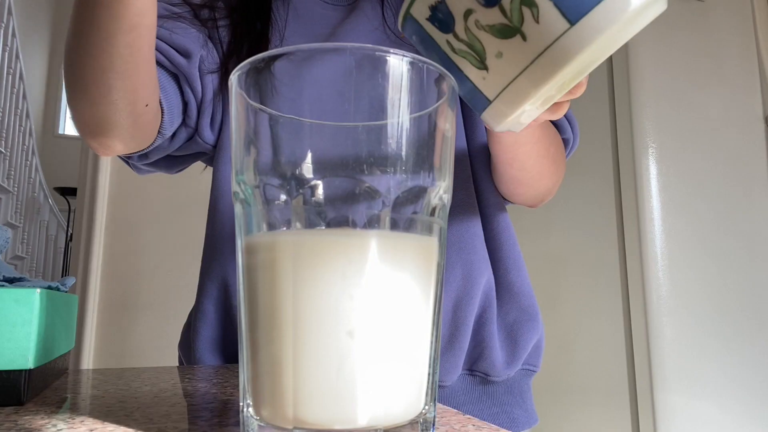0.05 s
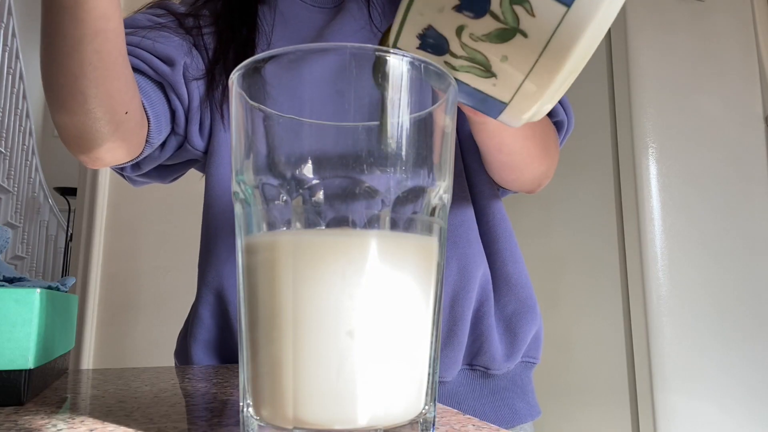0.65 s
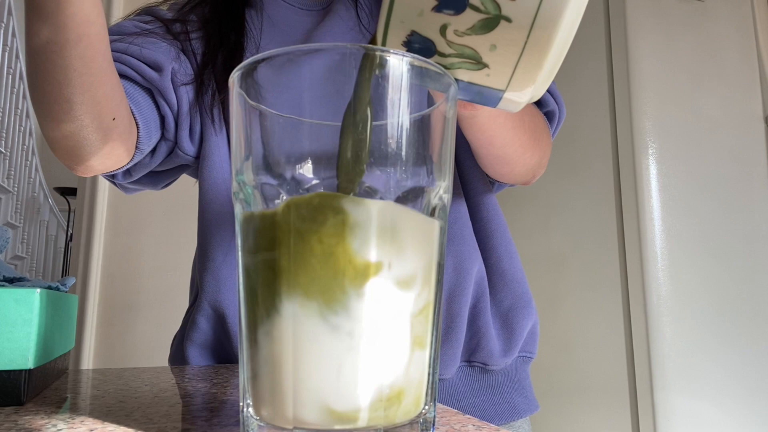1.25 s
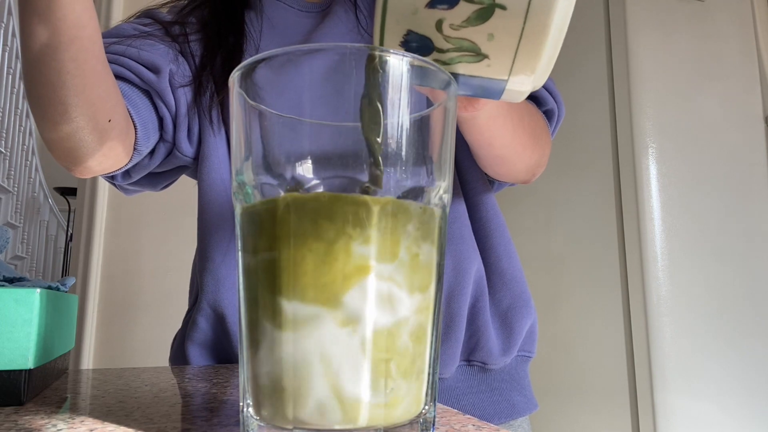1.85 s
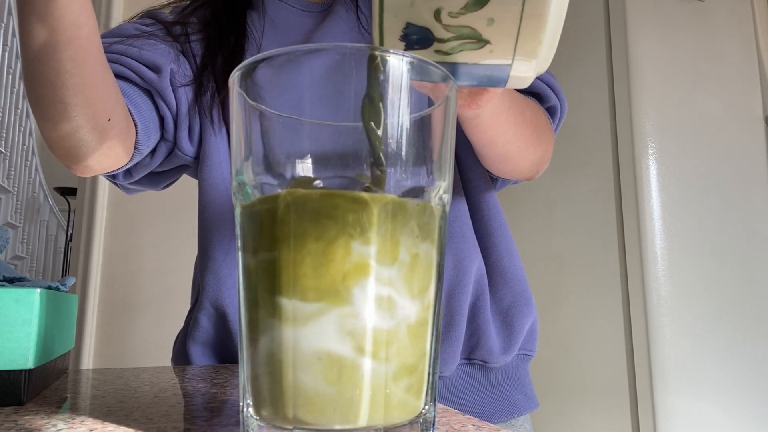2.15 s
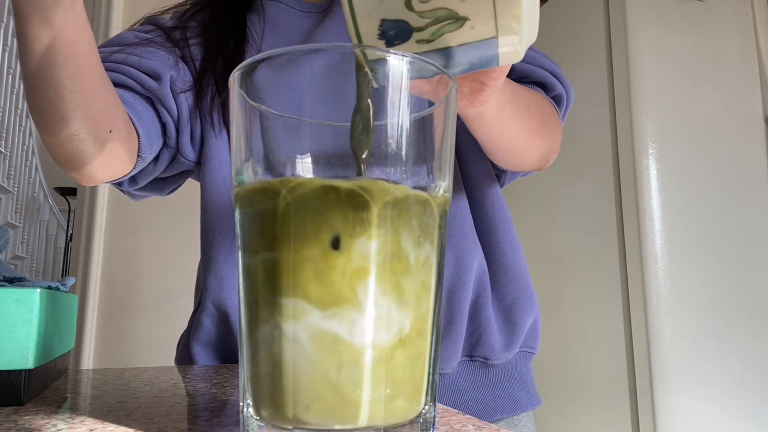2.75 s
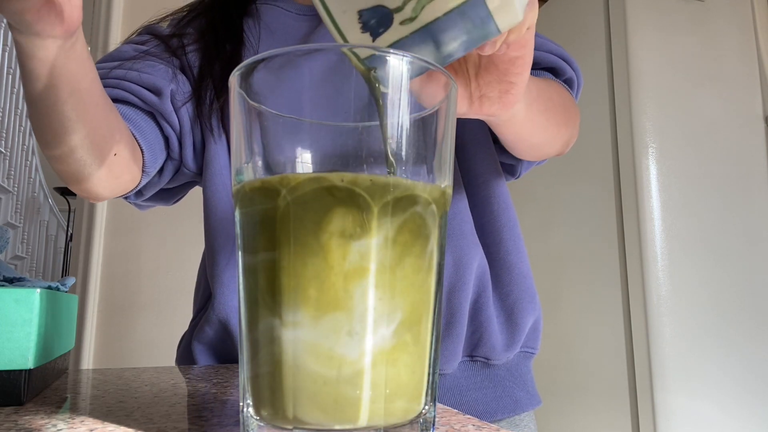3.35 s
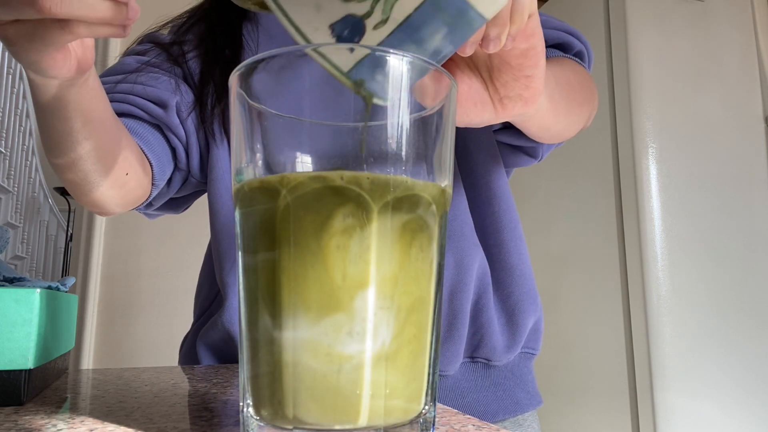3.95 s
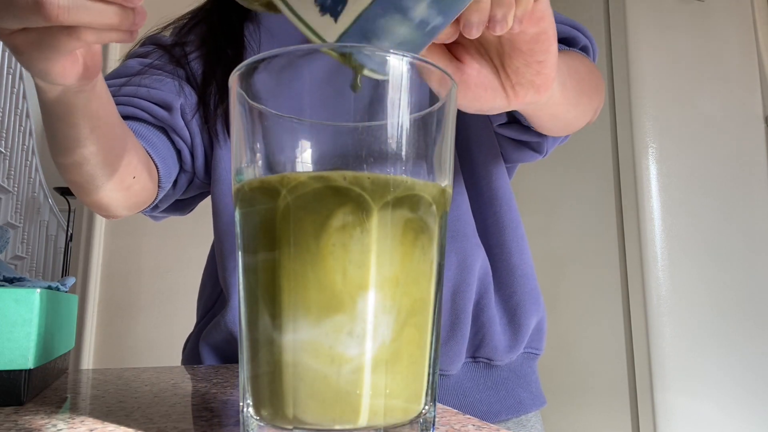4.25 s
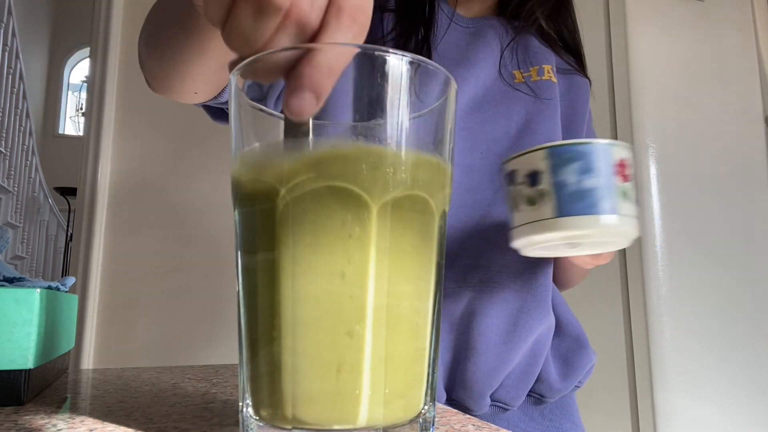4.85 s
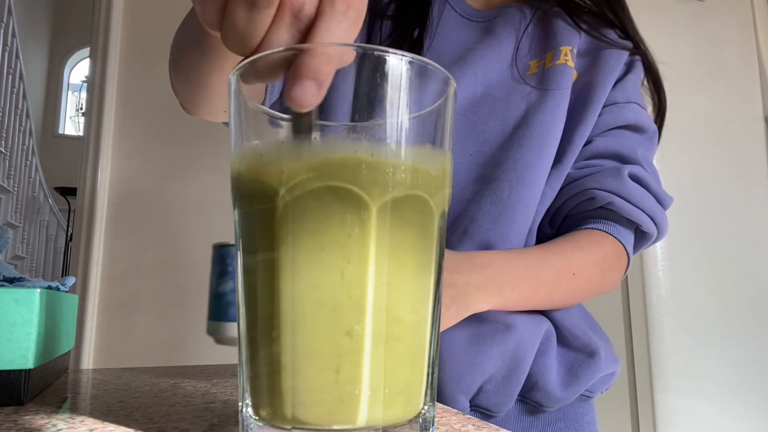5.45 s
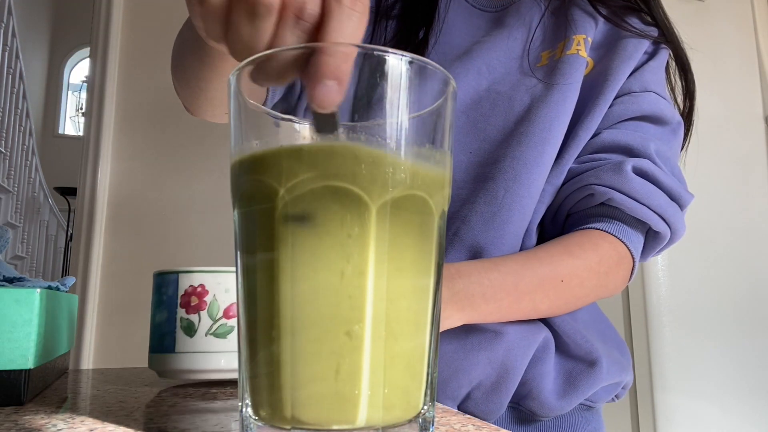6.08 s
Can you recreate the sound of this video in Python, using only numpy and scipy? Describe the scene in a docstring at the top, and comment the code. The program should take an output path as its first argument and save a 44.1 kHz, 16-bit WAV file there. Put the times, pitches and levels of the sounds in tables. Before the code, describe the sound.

A ceramic cup knocks on the rim of a glass of milk, and a thin stream of liquid pours in with quiet gurgles, small drips and a few light ticks. Then a steel spoon stirs quickly, clinking brightly on the glass wall and knocking on its base as the milk swirls. The stereo microphone is close by in a small kitchen with a faint appliance hum.

```python
"""A tall glass of milk rings in its wall modes as a ceramic cup knocks on its rim and rests there to pour.
The thin stream is heard as quiet gurgles, bubbles and spray; the added milk loads the wall and lowers
the ring. A steel spoon then stirs quickly, clinking on the wall and knocking on the base.
The stereo microphone stands close by on the counter of a small kitchen, where an appliance hums."""
import sys
import numpy as np
from scipy import signal
from scipy.fft import rfft, irfft, next_fast_len
from scipy.io import wavfile
from scipy.ndimage import map_coordinates

SR = 44100
rng = np.random.default_rng(int(sys.argv[2]) if len(sys.argv) > 2 else 0)


def store_pcm(level_fs):
    """Save levels as 16-bit WAV."""
    pcm = np.round(np.clip(level_fs, -1, 1) * 32767).astype(np.int16)
    wavfile.write(sys.argv[1], SR, np.atleast_2d(pcm).T)


N = 269792
SPOON_IN_S = 4.6  # the spoon enters the glass

# the motor's low and high tones: (frequency [Hz], level [dB])
HUM_TONES = [(96.9, -59), (145.3, -62.5), (199.2, -60), (220.7, -65.5), (360.7, -59.5), (387.6, -56),
             (683.7, -73.5)]
WHINE_TONES = [(3250, -92.5), (3750, -100)]
# spectra of rushing air, poured milk, stirred milk and a contact: (frequency [Hz], relative level [dB])
AIR_SPECTRUM = [(15, -27), (25, -9), (91, -3), (122, -11.5), (204, -9), (253, -13.5), (297, -8), (322, -14),
                (389, -9.5), (421, -16.5), (684, -15.5), (997, -30), (1240, -22.5), (2230, -44),
                (15500, -65)]
SLOSH_SPECTRUM = [(120, -29), (250, 6), (340, 0.5), (460, 10), (580, -15), (850, -9), (1500, -37),
                  (4000, -63)]
SWIRL_SPECTRUM = [(180, -44.5), (330, 7), (460, 8), (620, -21), (900, -15), (1400, -8), (2800, -14.5),
                  (5000, -24), (6200, -42), (10000, -63), (12500, -58.5), (15000, -69)]
CRACK_SPECTRUM = [(200, -16.5), (450, -7), (750, -6), (1150, 3.5), (1700, -15), (2400, -4), (3200, -18),
                  (5000, -10), (5900, -22.5), (8200, -1), (10200, -22), (12600, -0.5), (14200, -26.5),
                  (15800, -30)]
# likeness of the air noise at the two microphones: (frequency [Hz], correlation [-1 to 1])
AIR_CORRELATION = [(60, 0.91), (180, 0.55), (550, -0.4), (1650, -0.42), (4970, -0.31), (15000, 0.75)]
# milk moving under the stream and around the spoon: (time [s], level [dB])
SLOSH_LEVEL = [(0.38, -64), (0.45, -43.5), (0.56, -40.5), (0.63, -56), (0.75, -57), (0.82, -47.5),
               (0.92, -62), (1.4, -72), (3.5, -66.5), (4.6, -68.5)]
SWIRL_LEVEL = [(4.60, -111), (4.64, -46.5), (4.8, -41.5), (5.0, -51), (5.12, -40), (5.35, -47.5),
               (5.65, -48), (6.1, -50.5)]
# progress of the pour: (time [s], share still to come [0 to 1])
POUR_TO_COME = [(0.4, 1), (1.35, .75), (1.8, .6), (2.6, .34), (3.5, .22), (4.6, 0)]

# modes of the full glass: (frequency [Hz], relative level [dB], nominal t60 [s],
# pitch excess before the pour [fraction], left minus right [dB], left phase lead [rad])
GLASS_MODES = [(460.3, -15.5, 0.064, 0.0089, -6.5, 0.45), (637, -21.5, 0.052, 0.015, 17, -1.5),
               (762, -13.5, 0.083, 0.012, 4, -1.5), (897, -4.5, 0.034, 0.016, -6, -0.84),
               (1056, -10, 0.023, 0.037, -13.5, -1.3), (1273, -2.5, 0.016, 0, -12, -1.4),
               (1378, -5.5, 0.018, 0.028, -12.5, -2.5), (2028, -11.5, 0.27, 0.0773, 5, -2.3),
               (2048, -3, 0.19, 0.064, -6.5, -0.92), (2190, -24.5, 0.055, 0.053, 6.5, -4),
               (4494, -9.5, 0.17, .018, 0.5, 1), (7430, -19.5, 0.2, 0.033, -4, -0.4),
               (7484, -0.5, 0.066, 0.011, -2, -1.5), (12000, -10, 0.029, 0, -1, 0),
               (12580, -0.5, 0.02, 0.016, 1.5, -0.2)]
# modes of the cup with the counter, and of the spoon: (frequency [Hz], relative level [dB], t60 [s])
CUP_MODES = [(81.6, -16, 0.097), (215, -15, 0.035), (286, -13.5, 0.058), (364.5, 2, 0.035),
             (749, -13.5, 0.094), (866, 3, 0.026), (2448, -19.5, 0.12), (5717, -51, 0.16)]
SPOON_MODES = [(3906, -26, 0.12), (4020, -29, 0.18), (5204, -21.5, 0.11), (5267, -11, 0.062),
               (7700, -29, .08), (7700, -33, 0.047), (13300, -36, 0.049)]
# the glass's five registers, its low knock, fundamental and three overtones: (frequency [Hz])
REGISTER_HZ = [1100, 2050, 4500, 7500, 12500]
# how each kind of contact excites those registers: (relative drive [dB])
BUMP_DRIVE = [-3.5, -0.5, -12, -11.5, -39.5]  # a bump or tick during the pour
BUBBLE_DRIVE = [3, 1, -23, -26, -37]  # a bubble, through the liquid
KNOCK_DRIVE = [0.5, -8.5, -27, -21, -33.5]  # spoon tip on the thick base: mostly knock
CLINK_DRIVE = [-13, 0, -10.5, -21.5, -38.5]  # handle near the rim: a pure ring
STRIKE_DRIVE = [-5.5, 0.5, -26.5, -4.5, -7]  # bowl on the wall: hard and bright
SKID_DRIVE = [-34, -37.5, -16.5, -9.5, -33]  # the bowl skids just after a strike
REBOUND_DRIVE = [-20, -10.5, -30, -20.5, -24]  # then falls back on the wall

# bumps and light ticks on the glass during the pour:
# (time [s], thud [dB], hollow note [dB], ring [dB], brightness [dB], t60 scale [ratio])
POUR_BUMPS = [(0.3815, -13, -29, -31.5, 7, 1.53), (0.431, -20.5, -35, -65, 1, 0.65),
              (0.452, -37, -27, -69, 0, 0.53), (0.882, -58, -66, -52, -1, 0.48),
              (1.3215, -52, -35.5, -42, -6, 0.68), (2.436, -57, -59, -72, 19, 0.39),
              (2.6005, -49.5, -35, -39, -3.5, 0.75), (3.549, -57, -44, -59, -2, 0.86)]
# the cup and the spoon dragging on the glass: (time [s], level [dB])
CUP_DRAG_LEVEL = [(0.42, -69), (0.62, -65), (0.69, -95), (0.76, -66), (0.88, -65.5), (0.95, -78)]
SPOON_DRAG_LEVEL = [(4.63, -64), (5.1, -60.5), (5.55, -68), (6.1, -60)]
# bubbles and drops under the stream: (time [s], starting pitch [Hz], plink [dB], spray [dB])
BUBBLES = [(0.778, 6400, -63, -62), (0.891, 4110, -50.5, -53), (0.952, 8000, -45, -64),
           (0.96, 6470, -45, -50), (0.987, 4240, -48, -53), (1.01, 2930, -48, -52.5),
           (1.02, 3080, -48.5, -57), (1.393, 6300, -44, -60.5), (1.436, 6400, -52, -63),
           (1.513, 1330, -51, -78), (1.624, 1350, -40.5, -77), (1.787, 1425, -46.5, -78),
           (2.503, 6640, -59, -69), (3.202, 1400, -54, -82)]
# big bubbles shake the glass, small ones hardly: (bubble pitch [Hz], coupling [dB])
BUBBLE_COUPLING = [(1400, -12), (3000, -9.5), (5000, -25)]
# the spoon's tip on the base: (time [s], level [dB], brightness [dB])
TIP_KNOCKS = [(4.63, -31, 10.5), (4.65, -26, 12), (4.682, -29.5, 8.5), (4.746, -21, -7.5),
              (4.785, -25.5, 1), (4.941, -23, 10), (4.994, -27, 10), (5.0762, -12, -10),
              (5.2313, -14.5, -6), (5.274, -34.5, 20.5), (5.286, -25, 17), (5.382, -13.5, -16),
              (5.583, -26, 10), (5.641, -29, 7.5), (5.9315, -21.5, -19), (5.977, -27, 9), (6.104, -10, -15)]
# its handle on the glass: (time [s], level [dB], brightness [dB], t60 scale [ratio])
HANDLE_CLINKS = [(4.703, -21, -3, 0.66), (4.74, -26, -14, 0.32), (4.798, -27, 13, 0.95),
                 (4.811, -19, -1.5, 1.1), (4.999, -29, -8, 1), (5.052, -12, -4, 1.06),
                 (5.081, -20, 7.5, 0.73), (5.138, -19, 5.5, 0.49), (5.3525, -17, -11, 0.35),
                 (5.3775, -12.5, 6.5, 0.57), (5.7068, -10, -3.5, 0.47), (5.813, -15.5, 11, 0.41),
                 (6.0615, -9.5, -4, 0.48), (6.095, -16, 4.5, 1.9)]
# its bowl on the wall: (time [s], level [dB], brightness [dB], t60 scale [ratio], rebound delay [s])
BOWL_STRIKES = [(4.8265, -11.5, -1, 1.4, 0.032), (5.087, -25, -3, 0.39, 0.019),
                (5.1615, -7.5, -0.5, 1.27, 0.0245), (5.457, -12, -0.5, 1.15, 0.03),
                (5.7375, -16, -1.5, 0.65, 0.02), (5.8352, -12, -0.5, 0.9, 0.028)]

# the kitchen's reverberation time: (frequency [Hz], t60 [s])
ROOM_T60 = [(150, 0.98), (500, 0.24), (2000, 0.39), (5000, 0.25), (8000, .33), (13000, 0.2)]
# colour of the reverberant tail, duller near 6 kHz, 10 kHz and above 14 kHz: (frequency [Hz], level [dB])
TAIL_COLOUR = [(150, -4.5), (450, -1), (1000, -9), (2050, -12.5), (3100, -7), (3900, -3), (5200, -1.5),
               (6300, -12), (7500, -19), (8400, -13), (10200, -21), (12500, -11.5), (15000, -22)]


def amp(db):
    """Amplitude ratio of a level in decibels."""
    return 10 ** (np.asarray(db) / 20)


def unit(x):
    """The signal scaled to an rms of 1."""
    return x / np.sqrt(np.mean(x ** 2) + 1e-20)


def along(points, hz):
    """Interpolation of (frequency [Hz], value) points on a logarithmic axis."""
    f, v = np.transpose(points)
    return np.interp(np.log(hz + 1), np.log(f + 1), v)


def envelope(rows):
    """Amplitude per sample from (time [s], level [dB]) rows, silent outside them."""
    return amp(np.interp(np.arange(N) / SR, *np.transpose(rows), left=-np.inf, right=-np.inf))


def fade(t, t60):
    """Exponential decay of 60 dB in t60."""
    return np.exp(-np.log(1000) * t / t60)


def wobble(rate):
    """Smooth random modulation with rate knots a second."""
    knots = rng.standard_normal(int(N * rate / SR) + 4)
    return map_coordinates(knots, [np.arange(N) * rate / SR])


def spread(pan_db):
    """Left and right gains for a level difference."""
    return amp(pan_db * np.array([[.5], [-.5]]))


def filtered(x, response):
    """Linear filtering: the spectrum times a frequency response."""
    n = x.shape[-1]
    padded = next_fast_len(n + 2048)
    return irfft(rfft(x, padded) * response(np.fft.rfftfreq(padded, 1 / SR)), padded)[..., :n]


def noise(spectrum, correlation, size=N):
    """Coloured stereo noise of rms 1; the balance of mid and side sets its correlation."""
    def response(hz):
        angle = np.arccos(np.clip(along(correlation, hz), -1, 1)) / 2
        return amp(along(spectrum, hz)) * [np.cos(angle), np.sin(angle)]
    mid, side = filtered(rng.standard_normal((2, size)), response)
    return unit(np.array([mid + side, mid - side]))


def add(track, s, sound):
    """Superposition of a sound on a track at time s."""
    part = track[:, round(s * SR):][:, :sound.shape[-1]]
    part += sound[..., :part.shape[-1]]


def struck(modes, t):
    """Free vibration: a sum of damped sinusoids, their strengths varying slightly at each blow."""
    return sum(amp(db + rng.standard_normal()) * fade(t, t60) * np.sin(2 * np.pi * hz * t)
               for hz, db, t60 in modes)


def appliance_hum(air_db=-51.5, waver_db=0.93, waver_rad=1.0):
    """A motor radiates tones, wavering in level and phase, over broadband air noise."""
    t, hum = np.arange(N) / SR, np.zeros(N)
    for hz, db in HUM_TONES:
        peak = np.sqrt(2) * amp(db + waver_db * wobble(3.97))
        hum += peak * np.sin(2 * np.pi * hz * t + waver_rad * wobble(8.2))
    return hum + amp(air_db) * noise(AIR_SPECTRUM, AIR_CORRELATION)


def appliance_whine():
    """Random amplitude modulation widens two faint, high motor tones into narrow bands."""
    t = np.arange(N) / SR
    return sum(amp(db) * unit(wobble(140) * np.sin(2 * np.pi * hz * t)) for hz, db in WHINE_TONES)


def milk_gurgle(flutter_db=3):
    """The hollow of the glass colours the noise of moving milk, first poured, then stirred."""
    poured = envelope(SLOSH_LEVEL) * noise(SLOSH_SPECTRUM, [(400, 0.56)])
    stirred = envelope(SWIRL_LEVEL) * noise(SWIRL_SPECTRUM, [(400, 0.12), (3000, 0.19)])
    return (poured + stirred) * unit(amp(flutter_db * wobble(55)))


def pour_bumps(pan_db=-6, attack_s=0.0018, hollow_hz=455, hollow_t60=0.085):
    """Bumps and light ticks excite the modes of cup and counter, and a hollow resonance of the glass."""
    out, t = np.zeros((2, N)), np.arange(SR // 3) / SR
    for s, thud_db, hollow_db, *_ in POUR_BUMPS:
        thud = amp(thud_db) * struck(CUP_MODES, t) * spread(pan_db)
        hollow = amp(hollow_db) * fade(t, hollow_t60) * np.sin(2 * np.pi * hollow_hz * t)
        add(out, s, (thud + hollow) * (1 - np.exp(-t / attack_s)))
    return out


def glass_ring(t, drive, to_come=0., t60_scale=0.62, scatter_db=2.0, detune=0.0015, settle_s=0.11):
    """The wall's modes ring, driven in dB per register; mass loading by the milk lowers their pitch."""
    out, sides = np.zeros((2, len(t))), np.array([[.5], [-.5]])
    drive_spectrum = list(zip(REGISTER_HZ, drive))
    age = t * (.5 + t / settle_s)  # damping grows as the striker settles against the wall
    for hz, db, t60, excess, pan_db, lead in GLASS_MODES:
        level_draw, pitch_draw = rng.standard_normal(2)
        pitch = hz * (1 + excess * to_come + detune * pitch_draw)
        gain = amp(db + along(drive_spectrum, hz) + scatter_db * level_draw) * spread(pan_db)
        out += gain * fade(age, t60 * t60_scale) * np.sin(2 * np.pi * pitch * t + sides * lead)
    return out


def contact_crack(t, drive, gain_db=3, t60=0.022):
    """A brief contact has a broad spectrum: a burst of noise, shaped in dB per register."""
    drive_spectrum = list(zip(REGISTER_HZ, drive))
    pan = [(400, -5), (1100, -1.0), (5000, -0.5)]  # (frequency [Hz], left minus right [dB])
    burst = noise(CRACK_SPECTRUM, [(1000, 0.35), (4000, 0.087), (7500, 0.28)], size=len(t))
    crack = filtered(burst, lambda hz: amp(along(drive_spectrum, hz)) * spread(along(pan, hz)))
    return amp(gain_db) * crack * fade(t, t60)


def touch(pattern_db, db, bright_db=0):
    """Excitation of each register in dB; a harder contact lifts the overtones."""
    overtones = np.array(REGISTER_HZ) > REGISTER_HZ[1]
    return np.add(pattern_db, db) + bright_db * overtones


def contacts(skid_s=0.0062, knock_scale=0.52, skid_scale=0.61, bubble_scale=0.73):
    """The impulses that excite the glass, in order: (time [s], register drives [dB], t60 scale [ratio])."""
    hits = [(s, touch(CLINK_DRIVE, db, bright), scale) for s, db, bright, scale in HANDLE_CLINKS]
    hits += [(s, touch(KNOCK_DRIVE, db, bright), knock_scale) for s, db, bright in TIP_KNOCKS]
    for s, hz, db, _ in BUBBLES:
        hits.append((s, touch(BUBBLE_DRIVE, db + along(BUBBLE_COUPLING, hz)), bubble_scale))
    for s, db, bright, scale, rebound_s in BOWL_STRIKES:
        hits += [(s, touch(STRIKE_DRIVE, db, bright), scale),
                 (s + skid_s, touch(SKID_DRIVE, db, bright), skid_scale),
                 (s + rebound_s, touch(REBOUND_DRIVE, db, bright), skid_scale)]
    for s, thud_db, _, ring_db, bright, scale in POUR_BUMPS:
        knock, *rings = touch(BUMP_DRIVE, ring_db, bright)
        hits.append((s, [knock + thud_db - ring_db, *rings], scale))  # the knock follows the thud
    return sorted(hits, key=lambda hit: hit[0])


def glass_impacts(ring_db=-1, attack_s=0.00071, choke_db=-15, choke_t60=0.026):
    """Each impact damps the earlier vibration and excites the modes by where and how hard it lands."""
    out, t = np.zeros((2, N)), np.arange(SR // 4) / SR
    for s, drive, t60_scale in contacts():
        knock, fundamental, _, middle_overtone, top_overtone = drive
        kept = 1 / (1 + amp(knock - choke_db))  # a firm knock stops most of what still rings
        earlier = out[:, round(s * SR):][:, :len(t)]
        earlier *= (kept + (1 - kept) * fade(t, choke_t60))[:earlier.shape[1]]
        to_come = np.interp(s, *np.transpose(POUR_TO_COME))
        sound = amp(ring_db) * glass_ring(t, drive, to_come, t60_scale)
        hardness_db = (knock + middle_overtone) / 2
        if s > SPOON_IN_S:
            sound += amp(hardness_db) * struck(SPOON_MODES, t)
        sound += contact_crack(t, [knock, fundamental, hardness_db, middle_overtone, top_overtone])
        add(out, s, sound * (1 - np.exp(-t / attack_s)))
    return out


def drag_friction(slips_per_s=400, cup_db=6, spoon_db=8):
    """Stick-slip friction: tiny impulses keep the glass ringing with the cup's glaze or the spoon."""
    t = np.arange(SR // 4) / SR
    slips = (rng.random(N) < slips_per_s / SR) * amp(3.1 * rng.standard_normal(N))
    glass = glass_ring(t, drive=[3.5, -16.5, -10.5, -1.5, -30])
    onset = 1 - fade(t, 0.0049)

    def rubbed(modes, db):
        response = (glass + amp(db) * struck(modes, t)) * onset
        return unit(signal.fftconvolve(slips[None], response, axes=1)[:, :N])
    by_cup = rubbed([(2270, -16.5, 0.071), (2440, -15.5, 0.049)], cup_db)
    by_spoon = rubbed(SPOON_MODES, spoon_db)
    return envelope(CUP_DRAG_LEVEL) * by_cup + envelope(SPOON_DRAG_LEVEL) * by_spoon


def splashes(spray_t60=0.034, cycles=70, rise=0.094):
    """Bubbles resonate with a rising pitch and throw a fine spray where the stream meets the milk."""
    out, t = np.zeros((2, N)), np.arange(SR // 12) / SR
    spray_spectrum = [(1500, -7), (3000, -9), (5000, -10), (8000, 1),
                      (10500, -18), (13500, -4), (16000, -26)]
    for s, hz, plink_db, spray_db in BUBBLES:
        t60 = cycles / hz
        phase = 2 * np.pi * hz * t * (1 + rise * t / t60)
        plink = fade(t, t60) * (1 - fade(t, t60 / 10)) * np.sin(phase)
        spray = noise(spray_spectrum, [(5000, 0.3)], size=len(t)) * fade(t, spray_t60)
        add(out, s, amp(plink_db) * plink + amp(spray_db) * spray)
    return out


def kitchen_reverb(x, delay_s=.004):
    """Wall reflections form a diffuse tail, drawn anew each quarter second as hand and cup move."""
    out, step = np.zeros((2, N)), SR // 4
    correlation = [(300, 0.17), (2000, 0.12), (5000, 0.12), (7000, 0.48)]
    for start in range(0, N, step):
        white = noise([(1000, 0)], correlation, size=SR // 2)
        hz, t, bands = signal.stft(white, SR, nperseg=256)
        t60 = along(ROOM_T60, hz)[:, None]
        unit_energy = np.sqrt(2 * np.log(1000) / (t60 * SR))
        gain = amp(along(TAIL_COLOUR, hz))[:, None] * unit_energy
        _, tail = signal.istft(bands * gain * fade(t, t60), SR, nperseg=256)
        add(out, start / SR + delay_s, signal.fftconvolve(x[None, start:start + step], tail, axes=1))
    return out


def scene():
    """Superposition: the sharp sounds excite the room; the gurgle and the appliance lie underneath."""
    direct = glass_impacts() + pour_bumps() + drag_friction() + splashes()
    reverberant = kitchen_reverb(direct.mean(axis=0))
    return direct + reverberant + milk_gurgle() + appliance_hum() + appliance_whine()


def record(dry, low_hz=45, ceiling=.93, top_hz=15950):
    """Band limiting cuts the deep rumble and highest treble; soft saturation rounds the loudest peaks."""
    thinned = signal.sosfilt(signal.butter(2, low_hz, "high", fs=SR, output="sos"), dry)
    rounded = thinned / (1 + (thinned / ceiling) ** 12) ** (1 / 12)
    return filtered(rounded, lambda hz: 1 / np.sqrt(1 + (hz / top_hz) ** 200))


dry = scene()
out = record(dry)
store_pcm(out)
```